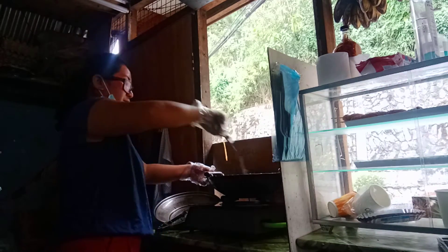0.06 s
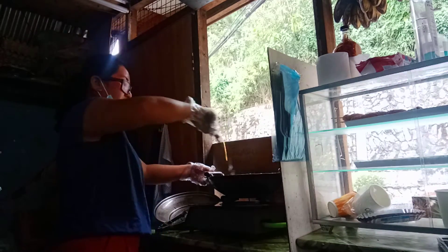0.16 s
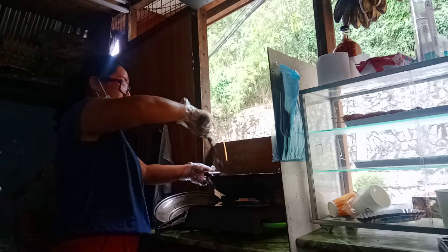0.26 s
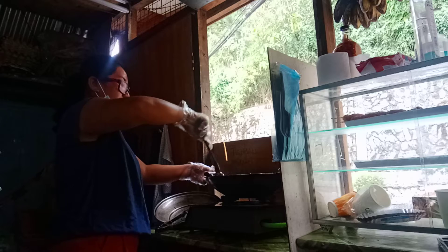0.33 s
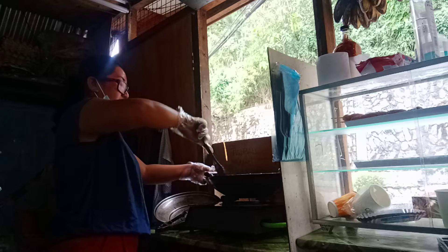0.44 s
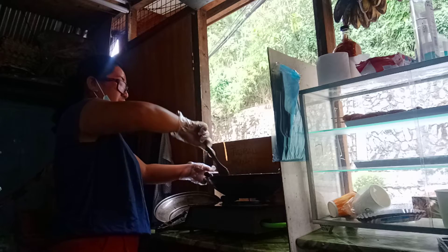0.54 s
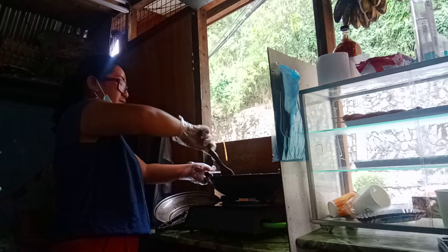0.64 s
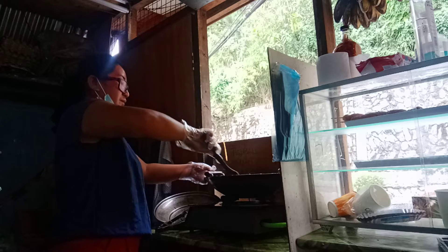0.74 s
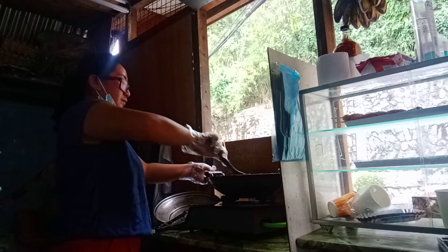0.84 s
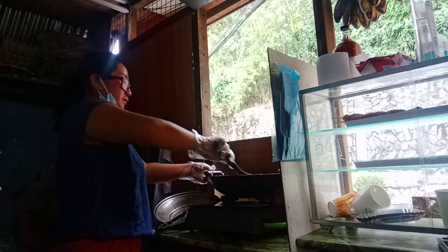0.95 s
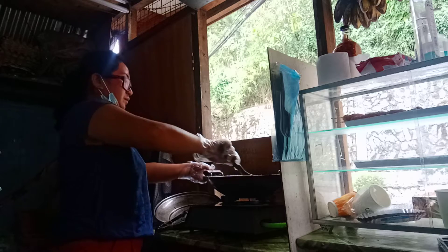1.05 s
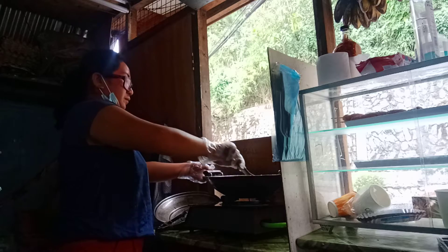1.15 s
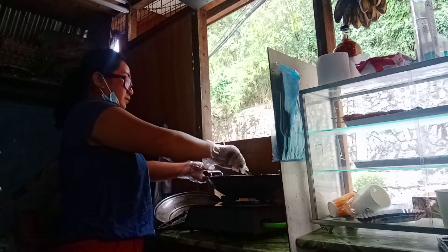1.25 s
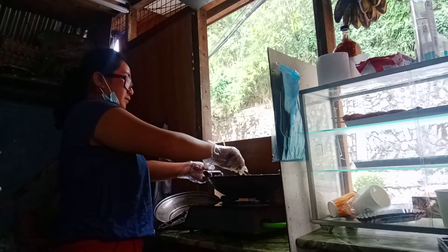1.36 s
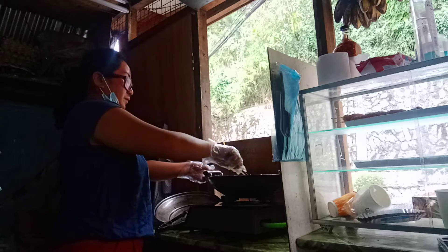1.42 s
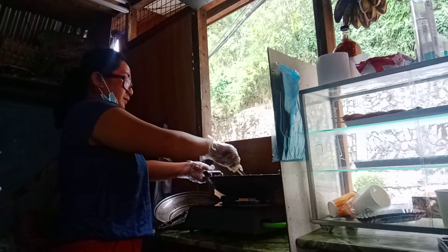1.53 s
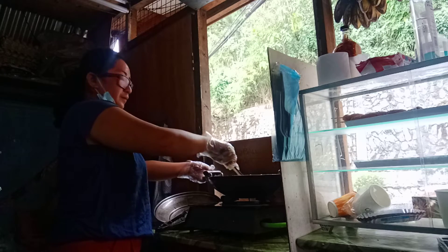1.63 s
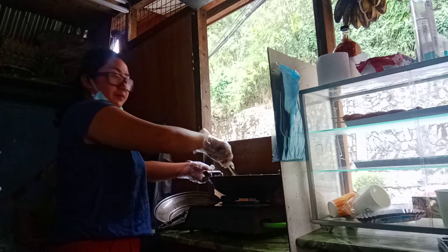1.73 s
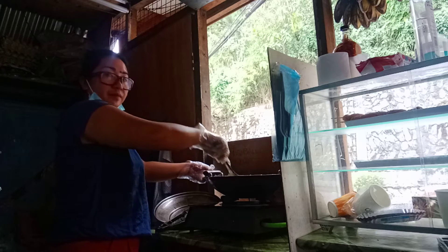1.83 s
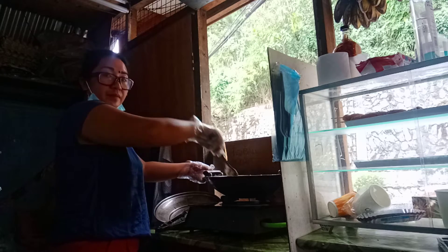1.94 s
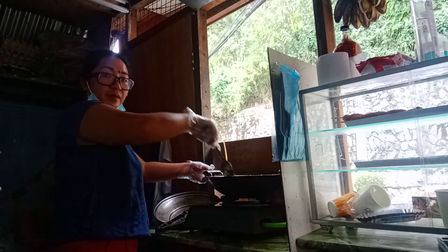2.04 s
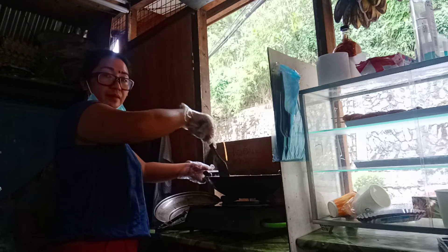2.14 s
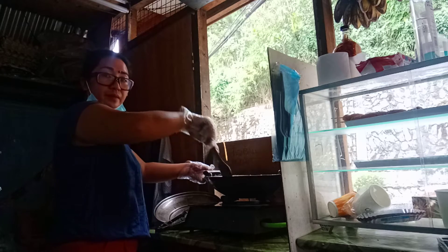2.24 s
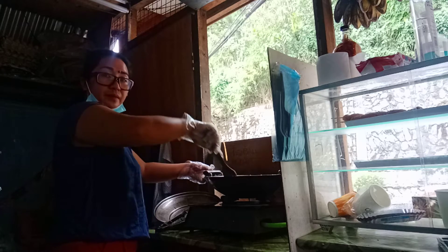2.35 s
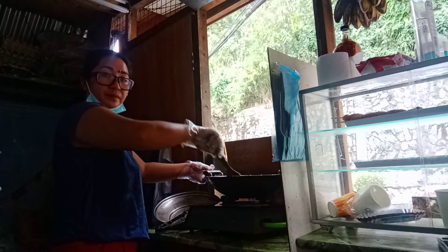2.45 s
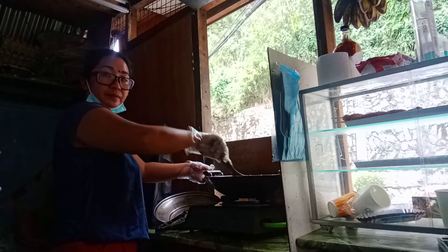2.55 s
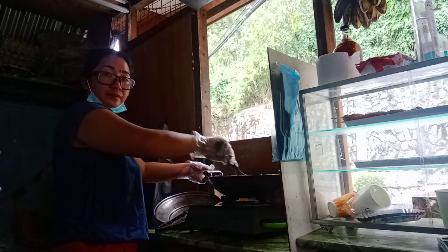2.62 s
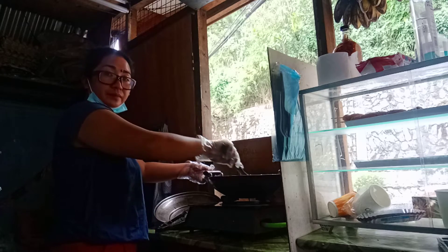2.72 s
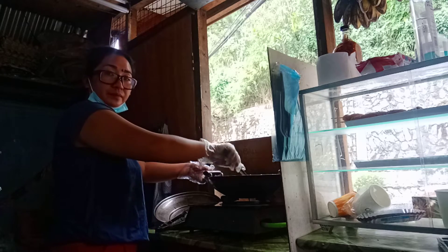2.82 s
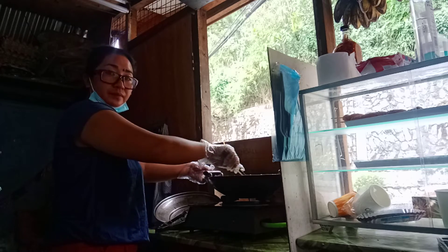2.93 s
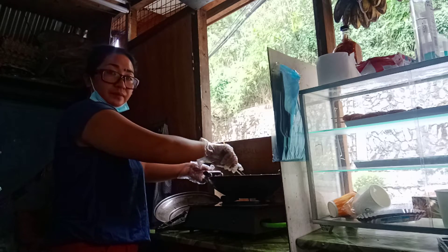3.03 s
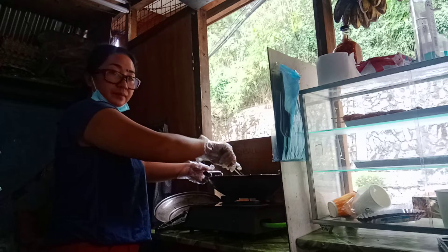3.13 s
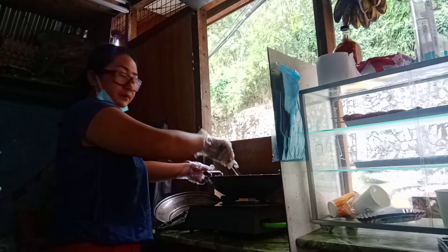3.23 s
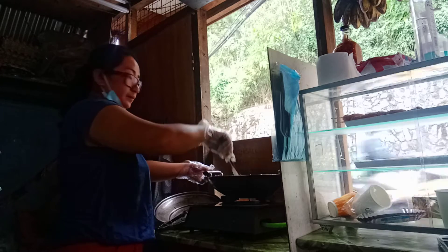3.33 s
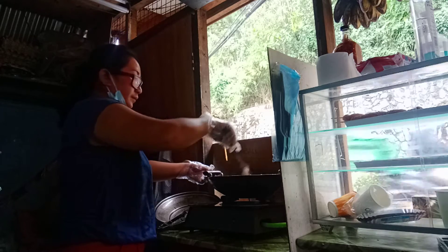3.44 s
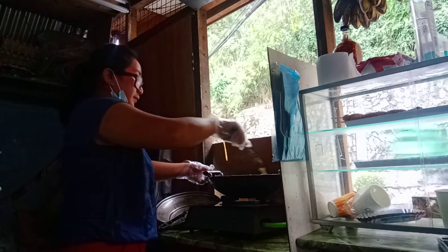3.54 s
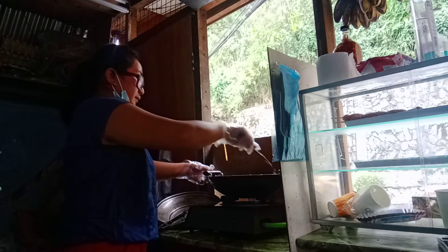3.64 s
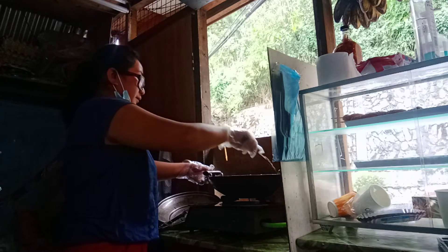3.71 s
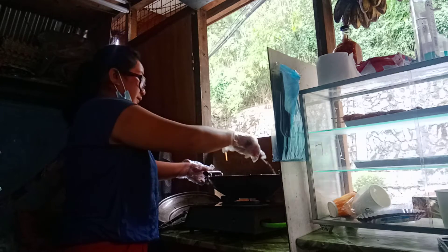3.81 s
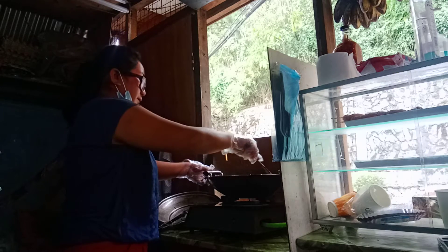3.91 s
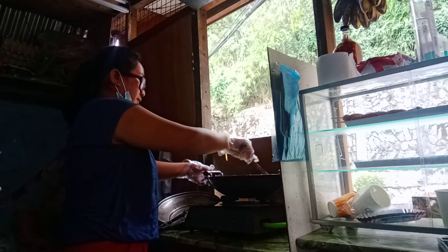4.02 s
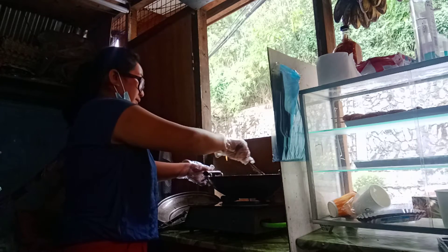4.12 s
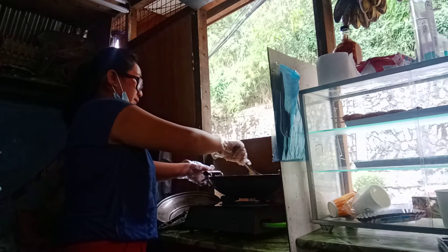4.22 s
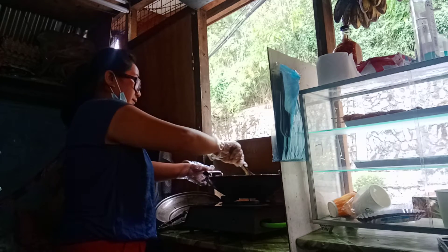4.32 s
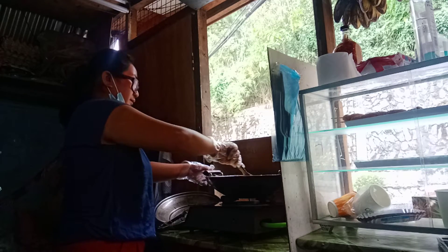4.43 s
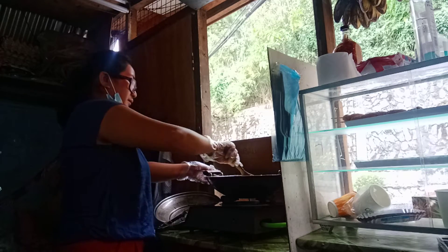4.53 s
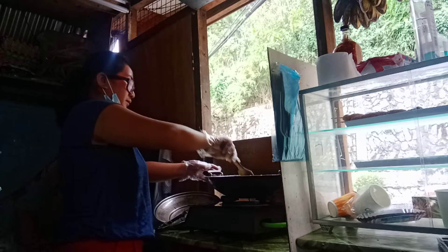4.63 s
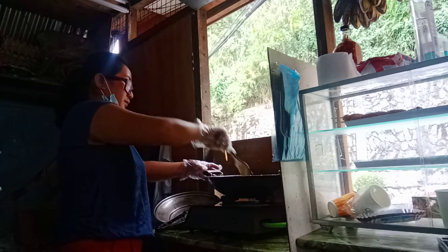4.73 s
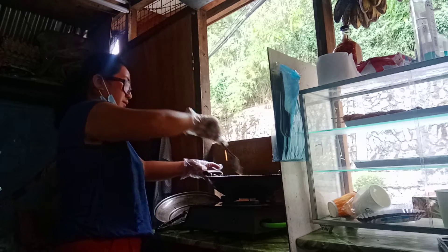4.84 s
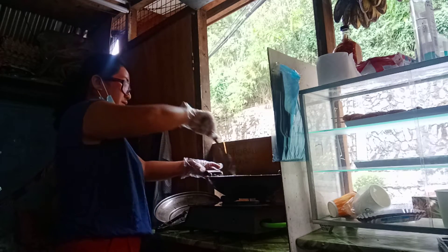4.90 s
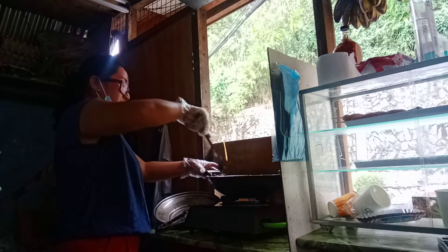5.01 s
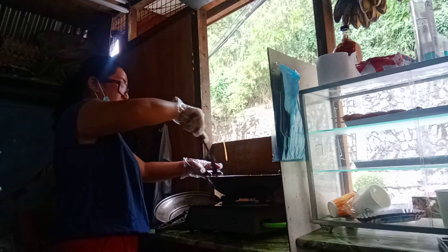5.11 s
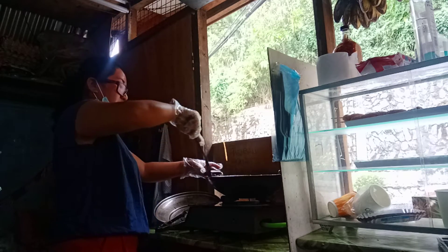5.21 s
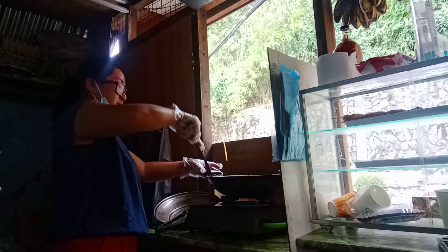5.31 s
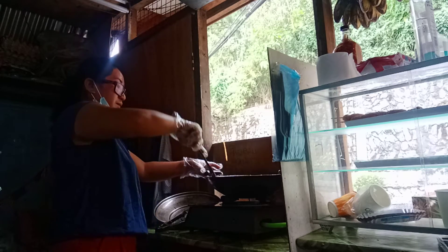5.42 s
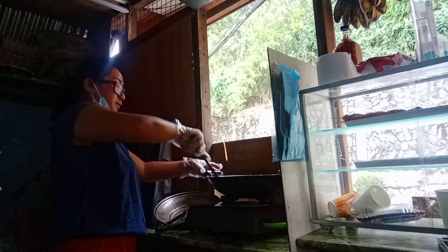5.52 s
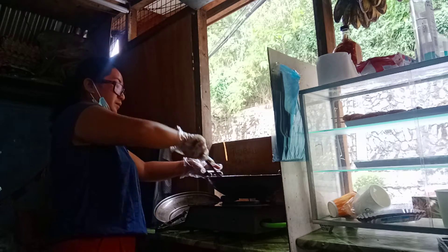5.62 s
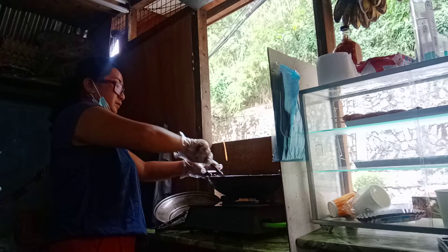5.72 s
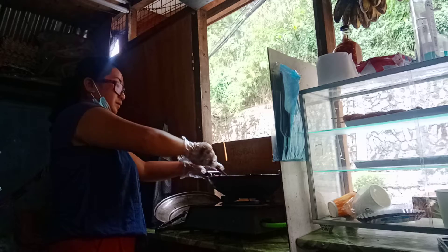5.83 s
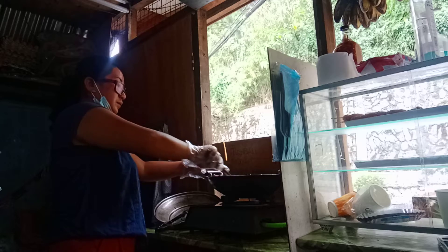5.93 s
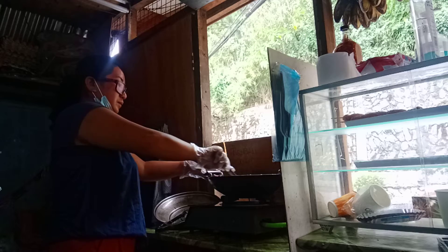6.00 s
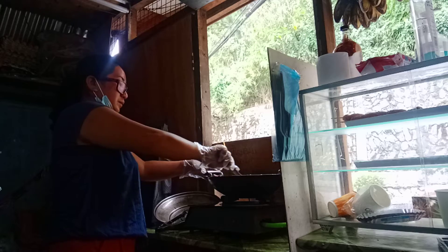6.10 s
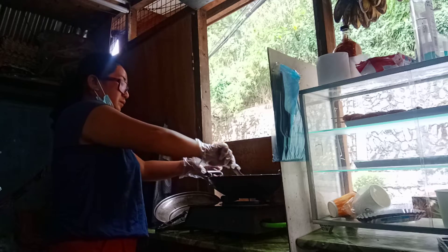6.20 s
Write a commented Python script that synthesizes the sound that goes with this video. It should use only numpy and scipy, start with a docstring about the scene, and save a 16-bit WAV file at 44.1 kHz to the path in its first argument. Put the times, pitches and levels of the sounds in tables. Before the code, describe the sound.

A far engine swells and drones away as a thumping motorcycle passes close, roars briefly, sags and revs again, over quiet pan scraping and taps.

```python
"""A single-cylinder motorcycle thumps nearer a roadside food stall; a second engine swells, then drones away.
A metal spatula scrapes and later clinks in a pan over steady faint hiss and road murmur.
The motorcycle passes the window, slows to idle, then picks up. Firing pulses are coloured into boom and bark,
random clicks ring the metal parts and noise makes the tyre roar. The far engine is a sum of harmonics;
the spatula is noise through resonances."""
import sys
import numpy as np
from scipy import signal
from scipy.fft import rfft, irfft
from scipy.io import wavfile
from scipy.ndimage import uniform_filter1d

SR = 44100
rng = np.random.default_rng(int(sys.argv[2]) if len(sys.argv) > 2 else 0)


def master(y):
    """Save y as 16-bit WAV."""
    cut = np.clip(np.atleast_2d(y).T, -1, 1)
    pcm = np.round(cut * 32767)  # scale
    wavfile.write(sys.argv[1], SR, pcm.astype(np.int16))


N = 276066
T = np.arange(N) / SR

# straight pass of the motorcycle; nearest distance and time
SPEED_M_S, ROAD_M, NEAREST_S = 7.3, 5.62, 3.598
# in line with the window: (start [s], end [s], edge softness [s])
WINDOW = (3.366, 4.05, 0.035)
# gone by and facing away: (time [s], softness [s])
GONE = (3.93, 0.29)
# tyre roar spectrum: (frequency [Hz], relative level [dB])
TYRE_SPECTRUM = [(100, -19.5), (410, 5), (490, -9), (570, -0.5), (760, -2), (960, 4), (1050, 1), (1150, -6),
                 (1370, -5), (1700, -10.5), (2300, -14), (4000, -38.5), (8000, -43)]
# low stall resonances: (frequency [Hz], width [Hz], relative level [dB])
ROOM_MODES = [(262.1, 9, 7), (320.4, 10, -1), (395.3, 17, -11.5), (523.4, 4.6, -15.5)]


def undb(db):
    """Decibels to amplitude."""
    return 10 ** (np.asarray(db) / 20)


def unit(x):
    """Scale to RMS 1."""
    return x / np.sqrt(np.mean(x ** 2))


def curves(table):
    """Each value column, interpolated linearly over time."""
    time_s, *columns = np.transpose(table)
    return [np.interp(T, time_s, column) for column in columns]


def colour(x, spectrum):
    """Shape by (Hz, dB) points, silent above the last, to unit level."""
    hz, db = np.transpose(spectrum)
    bins_hz = np.maximum(np.fft.rfftfreq(2 * N, 1 / SR), 1)
    gain = undb(np.interp(np.log(bins_hz), np.log(hz), db, right=-np.inf))
    return unit(irfft(rfft(x, 2 * N) * gain)[:N])


def noise(spectrum):
    """Unit noise coloured by (Hz, dB) points."""
    return colour(rng.standard_normal(N), spectrum)


def walk(rate_per_s):
    """Random control: Gaussian points at the given rate, joined by lines."""
    return np.interp(T * rate_per_s, np.arange(2048), rng.standard_normal(2048))


def resonate(x, hz, width_hz):
    """One resonance, gain 1 at its centre."""
    return signal.lfilter(*signal.iirpeak(hz, hz / width_hz, fs=SR), x)


def body(x, modes):
    """Parallel resonances."""
    return sum(undb(db) * resonate(x, hz, width_hz) for hz, width_hz, db in modes)


def cut(x, hz, kind, order):
    """Butterworth high-pass or low-pass."""
    return signal.sosfilt(signal.butter(order, hz, kind, fs=SR, output="sos"), x)


def delay(x, seconds):
    """Fixed or time-varying delay."""
    return np.interp(T - seconds, T, x, left=0)


def blend_ring(x, share, hz, width_hz):
    """Replace a share (fixed or varying) with the unit-level ring of one resonance."""
    return x + share * (unit(resonate(x, hz, width_hz)) - x)


def after(moment_s, softness_s):
    """Smooth step from 0 to 1."""
    return .5 + .5 * np.tanh((T - moment_s) / (2 * softness_s))


def between(start_s, end_s, softness_s):
    """Smooth gate: 1 inside the span, 0 outside."""
    return after(start_s, softness_s) * (1 - after(end_s, softness_s))


def stall(x, wet_db):
    """Small wooden room: decaying noise as a short diffuse tail."""
    t60_s = .3
    age_s = T[:SR // 2]
    tail = rng.standard_normal(len(age_s)) * undb(-60 * age_s / t60_s) * (age_s > .008)
    wet = signal.fftconvolve(x, tail / np.linalg.norm(tail))[:N]
    return (x + undb(wet_db) * wet) / np.hypot(1, undb(wet_db))


def background():
    """Steady broadband hiss and low road murmur."""
    # (frequency [Hz], relative level [dB])
    air_spectrum = [(20, 13), (60, 30.5), (150, 38), (300, 14.5), (600, 1.5), (1000, 5), (1600, -2),
                    (2500, -3.5), (5000, -6), (7200, -12.5), (11000, -13), (15500, -11)]
    return undb(-45.5) * noise(air_spectrum)


def motorcycle():
    """Firings boom through the exhaust, clicks ring the metal, tyres roar in passing."""
    # engine speed: (time [s], rate [firings/s])
    firing_rate = [(0.0, 23.7), (2.0, 24.0), (3.0, 23.58), (3.5, 22.61), (4.0, 21.62), (4.1, 20.35),
                   (4.28, 17.79), (4.42, 22.17), (4.6, 19.38), (4.8, 16.41), (5.0, 14.27), (5.18, 14.57),
                   (5.35, 18.43), (5.52, 17.62), (5.7, 20.28), (6.0, 22.69), (6.26, 25.38)]
    # metal resonances: (frequency [Hz], width [Hz], relative level [dB])
    casing_modes = [(651, 59, 11), (805, 140, 4.5), (933, 58, 10.5), (1116, 42, 11.5), (1233, 120, 10),
                    (1430, 82, 5), (1710, 210, -4), (1874, 160, -2)]
    # thin engine covers
    cover_modes = [(2380, 220, -3), (2560, 150, 1.5), (2800, 120, 2.5), (3080, 260, -5), (3305, 70, 6.3),
                   (3700, 260, -8), (4500, 500, -12), (5300, 700, -16)]
    # silencer shield and chain guard, same columns
    guard_modes = [(800, 60, 2), (885, 60, 0), (1110, 90, -3), (1480, 70, 0), (1650, 90, -5),
                   (1850, 130, -8), (2750, 600, -19)]
    # carry: (nearest level [dB], share of distance loss [ratio], walls [dB], window [dB], gone by [dB])
    casing_carry = (-48, 2, -2.5, 2.3, -7)
    # same columns
    cover_carry = (-70.5, 1.4, -12, 11, -3)
    # same columns
    guard_carry = (-50.5, 3.3, -4, 0, 0)
    # same columns
    tyre_carry = (-52.4, 1.6, -1, 3, -5.5)

    rate, = curves(firing_rate)
    turns = np.cumsum(rate) / SR
    rattle = knocks(turns)
    casing = shaken(rattle, casing_modes) * undb(heard_db(casing_carry))
    covers = shaken(rattle, cover_modes) * undb(heard_db(cover_carry))
    past_window = after(WINDOW[1], WINDOW[2])
    guards = shaken(rattle, guard_modes) * undb(heard_db(guard_carry)) * past_window
    tyres = tyre_roar() * undb(heard_db(tyre_carry))
    return exhaust(rate, turns) + casing + covers + guards + tyres


def heard_db(carry):
    """Level in the stall from distance, walls, window and heading."""
    nearest_db, spread, wall_db, window_db, gone_db = carry
    # level with the open front: (start [s], end [s], softness [s])
    front = (2.5, 4.77, 0.14)
    distance_m = np.hypot(SPEED_M_S * (T - NEAREST_S), ROAD_M)
    loss_db = spread * 20 * np.log10(distance_m / ROAD_M)
    walls_db = wall_db * (1 - between(*front))
    return nearest_db - loss_db + walls_db + window_db * between(*WINDOW) + gone_db * after(*GONE)


def throttle(rate):
    """0 while speed holds or falls, towards 1 with smoothed acceleration."""
    lag_s, full_hz_per_s = 0.15, 1.4  # full: scale of the tanh
    gaining = uniform_filter1d(np.gradient(rate, T), int(lag_s * SR))
    return np.tanh(np.maximum(delay(gaining, lag_s / 2), 0) / full_hz_per_s)


def effort_db(rate):
    """Exhaust level rises with throttle and revs, sags at each stumble."""
    throttle_db, rev_db_per_octave = 4, 6
    # weak firing: (centre [s], Gaussian length [s], level [dB])
    stumbles = [(4.77, .03, -6), (4.96, .03, -5), (5.03, .03, -2.5), (5.88, .07, -2.5)]
    sag_db = sum(db * np.exp(-((T - centre_s) / length_s) ** 2) for centre_s, length_s, db in stumbles)
    return throttle_db * throttle(rate) + rev_db_per_octave * np.log2(rate / rate[0]) + sag_db


def firings(turns, rate):
    """One pulse per engine cycle; timing and strength less even at low speed."""
    jitter_s, strength_db = .00014, .5  # spreads at top speed
    times_s = np.interp(np.arange(1, int(turns[-1]) + 1), turns, T)
    uneven = (rate.max() / np.interp(times_s, T, rate)) ** 2
    late, strong = rng.standard_normal((len(times_s), 2)).T * uneven
    pulses = np.zeros(N)
    # late already holds one factor of uneven
    at = np.clip((times_s + jitter_s * uneven * late) * SR, 0, N - 1).astype(int)
    pulses[at] = undb(strength_db * strong)
    return unit(pulses / np.sqrt(rate))


def exhaust(rate, turns):
    """Firing pulses and turbulent gas become a silencer boom and gassy bark, and ring the stall."""
    # boom spectra: (frequency [Hz], relative level [dB])
    ahead_spectrum = [(45, -38), (74, -24), (87, -3), (95, -1), (114, .5), (143, 0), (158, -17), (172, -31),
                      (260, -60)]
    # right behind, same columns
    behind_spectrum = [(25, -39), (48, -19), (68, -2.5), (85, -1.5), (103, 0), (135, -1.5), (160, -15),
                       (200, -31), (330, -55)]
    # down the road, same columns
    away_spectrum = [(25, -46), (50, -24), (72, -3), (95, -1), (115, 0), (135, -2), (152, -9), (168, -22),
                     (260, -52)]
    # silencer overtones, same columns
    bark_spectrum = [(120, -10.5), (163, 3), (190, 0), (220, -1), (245, -3.5), (264, -10.5), (290, -14),
                     (335, -26.5), (430, -21.5), (490, -31), (900, -39), (3000, -82.5)]
    # overtones from behind, same columns
    bark_behind_spectrum = [(120, -17.5), (165, -1.5), (188, 5.5), (212, 5.5), (245, 3.5), (270, -8.5),
                            (290, -8.5), (345, -17), (420, -13), (490, -16.5), (900, -38), (3000, -73.5)]
    # wall echo: (time [s], lag [s], share [ratio])
    wall_echo = [(0, .018, .3), (1.2, .0167, .45), (1.6, .0172, .4), (1.95, .0203, .35), (2.35, .017, .45),
                 (2.75, .0205, .4), (3.2, .0212, .45), (3.5, .019, .1), (4.0, .0195, .2), (4.6, .021, .4),
                 (4.85, .0175, .4), (5.3, .0185, .3), (6.26, .0168, .35)]
    # carry: (nearest level [dB], share of distance loss [ratio], walls [dB], window [dB], gone by [dB])
    boom_carry = (-19.5, 1.41, -1, -1, 0.5)
    # same columns
    bark_carry = (-36, 0.79, -4, 0, -2.5)
    # room ringing, same columns
    ring_carry = (-45, 1, 0, -1, -4.5)
    # open pipe end points at the stall: (start [s], end [s], softness [s])
    rear_span = (4.03, 4.7, 0.018)
    rear_db, away_db, open_db, burble_base_db = 0, -0.4, -2.5, -20
    echo_wander_s, idle_waver_s = .0009, .0009

    effort, in_window, gone = effort_db(rate), between(*WINDOW), after(*GONE)
    boom_db = heard_db(boom_carry) + effort
    bark_db = heard_db(bark_carry) + 0.16 * effort
    rear, away = between(*rear_span), after(*rear_span[1:])
    pulses = firings(turns, rate)
    swell = delay(pulses, .0125)
    gas = unit(np.exp(-(turns % 1) / 1.3) * rng.standard_normal(N))
    # gas between strokes stands out most when the boom is weak
    burble = gas * undb(-.6 * (boom_db - boom_db.max()) + burble_base_db)

    # the moving echo lifts one firing harmonic after another
    lag_s, share = curves(wall_echo)
    lag_s = lag_s + echo_wander_s * gone * walk(14)
    thumps = (swell + share * delay(swell, lag_s)) / np.hypot(1, share) + burble

    # deepest room resonance, through the window
    ahead = blend_ring(colour(thumps, ahead_spectrum), 0.24 * in_window, hz=110, width_hz=8.5)
    # pipe ring
    behind = unit(blend_ring(colour(thumps, behind_spectrum), .1, hz=101, width_hz=16))
    narrow = colour(thumps, away_spectrum)
    # the stall rings along near 120 Hz, with wavering pitch
    distant = unit(blend_ring(narrow, .33, hz=120, width_hz=26))
    distant = delay(distant, idle_waver_s * walk(30))
    # opening the throttle tightens the thump
    behind = behind + throttle(rate) * (undb(open_db) * narrow - behind)
    boom = (1 - rear - away) * ahead + rear * undb(rear_db) * behind + away * undb(away_db) * distant

    puffs = delay(pulses, .004) + .55 * gas
    barks = stall(puffs, wet_db=-3)
    bark = (1 - gone) * colour(barks, bark_spectrum) + gone * colour(barks, bark_behind_spectrum)
    ringing = cut(body(puffs + 4.3 * gas, ROOM_MODES), 210, "high", order=3)
    ringing = unit(cut(ringing, 560, "low", order=4))
    return boom * undb(boom_db) + bark * undb(bark_db) + ringing * undb(heard_db(ring_carry))


def knocks(turns):
    """Valve gear and combustion: dense random clicks, strongest just after each firing."""
    clicks_per_s, accent, accent_phase_turns = 1800, 1.2, .15
    clicks = (rng.random(N) < clicks_per_s / SR) * rng.standard_normal(N)
    return unit(clicks * (1 + accent * np.exp(-((turns - accent_phase_turns) % 1) / .3)))


def shaken(x, modes):
    """Metal resonances on a running engine, each fluttering in level and delay; unit level."""
    flutter_db, flutter_per_s, waver_s = 2.8, 21, .00025
    out = 0
    for hz, width_hz, db in modes:
        ring = resonate(resonate(x, hz, width_hz), hz, 4 * width_hz)
        level_db = db + flutter_db * np.tanh(walk(flutter_per_s))
        out = out + undb(level_db) * delay(ring, waver_s * walk(flutter_per_s))
    return unit(out)


def tyre_roar():
    """Tread and grit flicker the roar; its echo off the bank across the road sweeps a comb through it."""
    extra_m, share, sound_m_s = 5, 0.83, 343
    along_m = SPEED_M_S * (T - NEAREST_S)
    path_m = np.hypot(along_m, ROAD_M + extra_m) - np.hypot(along_m, ROAD_M)
    roar = noise(TYRE_SPECTRUM)
    flicker = undb(2 * walk(24) + 0.3 * walk(6.5))  # dB
    return unit(roar + share * delay(roar, path_m / sound_m_s)) * flicker


def far_engine():
    """Wavering harmonics over rumble, clatter, tyre noise and a noise-fed hum in the stall modes."""
    # (harmonic [multiple], relative level [dB])
    orders = [(1, -21), (2, 0), (3, -12.5), (4, -14), (5, -22), (6, -25), (7, -28), (8, -33), (10, -38)]
    # (frequency [Hz], relative level [dB])
    rumble_spectrum = [(25, -25.5), (50, -18.5), (90, -17.5), (170, 9.5), (300, -5.5), (420, -8),
                       (550, -11.5), (650, -33.5), (1500, -33), (4000, -53.5)]
    # (frequency [Hz], width [Hz], relative level [dB])
    far_casing_modes = [(975, 96, 2.5), (1126, 100, 2), (1340, 90, 2), (1480, 240, -3)]
    mean_hz, peak_s, rise_db_per_s, fade_db_per_s = 54.6, 0.63, 5, 4.5
    engine_db, rumble_db, clatter_db, hum_db = -27, -14, -64, -46.7  # rumble: relative to engine
    rumble_fade_db_per_s, tyre_db, tyre_fade_db_per_s = 3.8, -54, 23.5
    gone_s, gone_softness_s = 2.89, 1

    since_s = T - peak_s
    swell_db = rise_db_per_s * np.minimum(since_s, 0) - fade_db_per_s * np.maximum(since_s, 0)
    turns = np.cumsum(mean_hz * (1 + .009 * walk(16))) / SR
    drone = 0
    for k, line_db in orders:
        # higher harmonics flutter more
        line = np.sin(2 * np.pi * (k * turns + rng.random()))
        drone = drone + undb(line_db + .7 * k * walk(11)) * line
    rumble = noise(rumble_spectrum) * undb(2.2 * walk(16) - rumble_fade_db_per_s * T)
    tyres = noise(TYRE_SPECTRUM) * undb(tyre_db - tyre_fade_db_per_s * T)
    clatter = shaken(knocks(turns), far_casing_modes)
    hum = 0
    for hz, width_hz, db in ROOM_MODES:
        ring = resonate(resonate(rng.standard_normal(N), hz, width_hz), hz, 2 * width_hz)
        hum = hum + undb(db) * unit(ring)
    engine = undb(engine_db) * (undb(swell_db) * unit(drone) + undb(rumble_db) * rumble)
    leaving = engine + undb(clatter_db) * clatter + undb(hum_db) * unit(hum)
    return leaving * (1 - after(gone_s, gone_softness_s)) + tyres


def spatula():
    """Stick-slip scraping: each stroke is one noise-fed ring plus broad rasp."""
    # (start [s], length scale [s], level [dB], ring [Hz], width/ring [ratio], rasp/ring [dB])
    strokes = [(0.775, .055, -55, 450, .4, -14), (1.415, .04, -59, 1270, .06, -14),
               (1.66, .05, -51, 450, .3, -18), (2.01, .04, -49, 360, .3, -22),
               (2.26, .05, -49, 360, .35, -22), (4.658, 0.08, -56.5, 404, .3, -18),
               (4.852, 0.055, -53, 330, .9, -7), (5.03, 0.052, -60, 505, .2, -18),
               (5.575, .04, -74, 3500, .2, -3), (5.66, .035, -62, 420, .2, -12)]
    # (frequency [Hz], relative level [dB])
    rasp_spectrum = [(300, -11), (1000, 4), (3000, -14.5), (5500, -16), (9000, -36), (15000, -35.5)]
    out, rasp = np.zeros(N), noise(rasp_spectrum)
    slips = undb(3 * walk(300))
    for start_s, length_s, db, hz, width, rasp_db in strokes:
        age = np.clip((T - start_s) / length_s, 0, 4)
        pressure = 3 * age * np.exp(1 - 3 * age)
        ring = resonate(slips * rng.standard_normal(N), hz, width * hz)
        ring = unit(resonate(ring, hz, (width + .25) * hz))
        out += undb(db) * pressure * (ring + undb(rasp_db) * slips * rasp)
    return stall(out, wet_db=-14)


def taps():
    """Blade knocks: cushioned noise pushes ring the pan modes near each tap's centre frequency."""
    # (start [s], level [dB], ring centre [Hz], spread [octaves], contact decay [s])
    knock_list = [(2.072, -67.5, 4000, .2, .014), (2.612, -64.5, 2000, .6, .009),
                  (3.128, -65.5, 3400, .17, .013), (3.365, -68, 4000, .5, .008),
                  (3.902, -68, 3700, .6, .008), (3.935, -67.5, 3700, .6, .008), (4.24, -68, 3700, .6, .009),
                  (4.93, -73, 3800, .6, .007), (5.274, -69.5, 2030, .12, .006),
                  (5.323, -67.5, 2030, .2, .008), (5.362, -68, 2000, .12, .009),
                  (5.598, -65.7, 3620, .2, .008), (5.692, -73, 3500, .8, .009),
                  (5.931, -69.3, 2520, .12, .006), (6.064, -72.5, 3450, .15, .005)]
    # pan and blade: (frequency [Hz], width [Hz], relative level [dB])
    pan_modes = [(1290, 30, -2), (1860, 30, -2), (2030, 24, 0), (2520, 24, 0), (2690, 35, -3),
                 (3380, 30, -1), (3520, 30, 0), (3950, 60, 0), (4300, 70, -2), (4750, 90, -4),
                 (5500, 120, -6)]
    cushion = .8  # exponent: food lets the push swell before it fades
    scratch_db, level_window_s = -7, .035
    out = np.zeros(N)
    age_s = T[:SR // 4]
    for start_s, db, centre_hz, spread, contact_s in knock_list:
        push = rng.standard_normal(len(age_s)) * age_s ** cushion * np.exp(-age_s / contact_s)
        ring = 0
        for hz, width_hz, mode_db in pan_modes:
            nearness = np.exp(-.5 * (np.log2(hz / centre_hz) / spread) ** 2)
            ring = ring + undb(mode_db) * nearness * unit(resonate(push, hz, width_hz))
        scratch = resonate(push, centre_hz, spread * centre_hz)
        scratch = unit(resonate(scratch, centre_hz, centre_hz))
        tap = unit(unit(ring) + undb(scratch_db) * scratch)
        # level refers to the energy averaged over level_window_s
        tap = undb(db) * np.sqrt(level_window_s / age_s[-1]) * tap
        at = int(start_s * SR)
        out[at:at + len(tap)] += tap[:N - at]
    return stall(out, wet_db=-7)


def scene():
    """Sum of all layers, one channel."""
    return (background() + motorcycle() + far_engine() + spatula() + taps())[None]


def record(dry):
    """4 ms fade-in, then a steep elliptic low-pass."""
    top_hz = 15500
    dry = dry * np.minimum(T / .004, 1)
    return signal.sosfilt(signal.ellip(12, .1, 80, top_hz, fs=SR, output="sos"), dry)


dry = scene()
out = record(dry)
master(out)
```